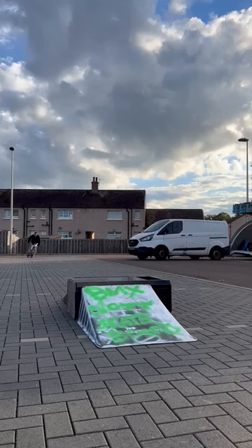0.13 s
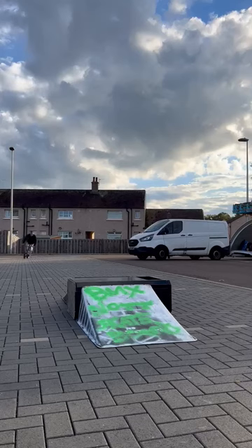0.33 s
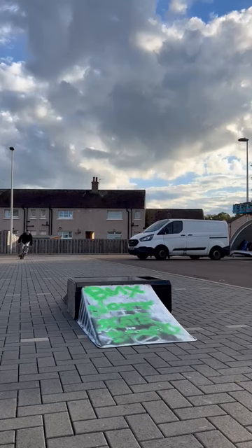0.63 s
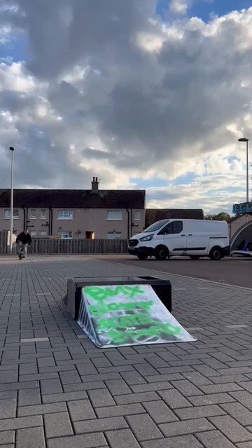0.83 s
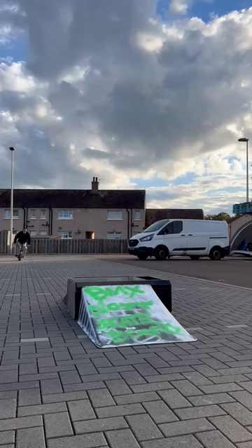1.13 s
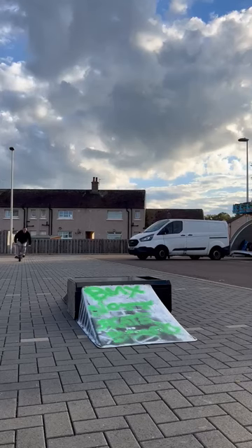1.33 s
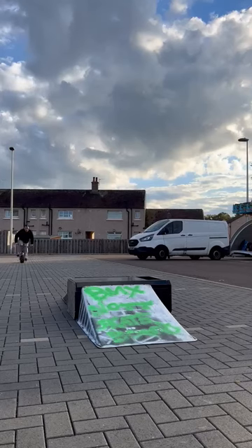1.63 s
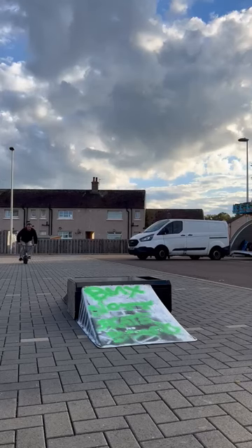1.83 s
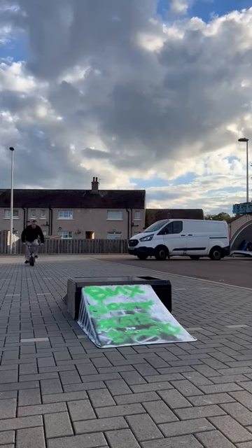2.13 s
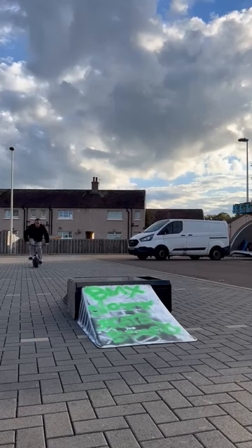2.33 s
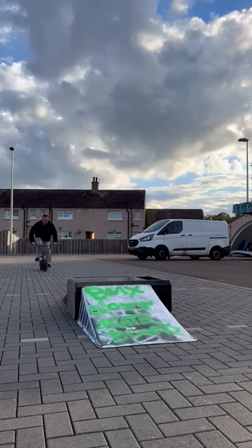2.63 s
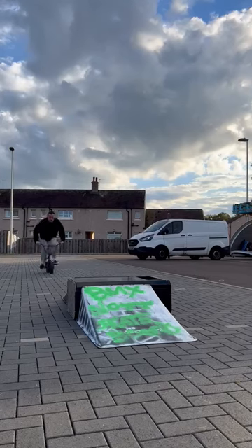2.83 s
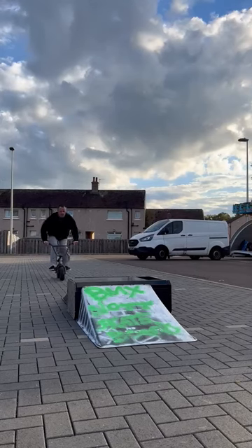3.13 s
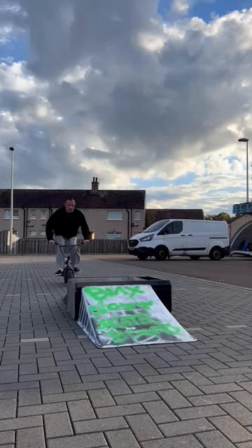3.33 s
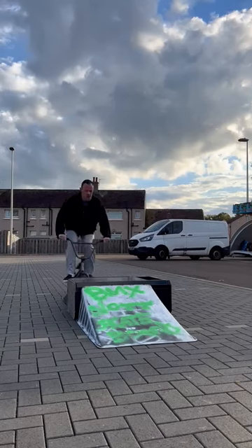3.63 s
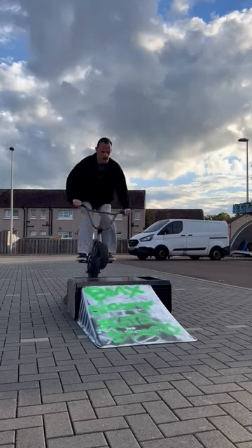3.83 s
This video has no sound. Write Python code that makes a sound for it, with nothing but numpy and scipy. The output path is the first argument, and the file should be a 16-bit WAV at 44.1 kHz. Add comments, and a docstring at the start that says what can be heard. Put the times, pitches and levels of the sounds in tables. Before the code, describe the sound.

Bicycle wheels bang hard onto a hollow ramp at the end, cracking, knocking and booming, after tyres patter ever closer over block paving in an open yard, with light wind buffeting a phone on the ground.

```python
"""Tyres patter over block paving, ever clearer, then wheels slam onto a hollow ramp that cracks, knocks and booms.
The patter is a slap and a gritty burst per joint, over a roar and a narrow hum that grow as the bike nears,
and a treble hiss that drops away before the ramp. Front and rear wheel ring damped modes of the ramp;
the freewheel of the coasting rider buzzes tooth by tooth, louder across the top. House fronts echo faintly,
light wind buffets the microphone of a phone on the ground, and the town murmurs behind."""
import sys
import numpy as np
from scipy import signal
from scipy.fft import rfft, irfft
from scipy.io import wavfile
from scipy.ndimage import uniform_filter1d

SR = 44100
rng = np.random.default_rng(int(sys.argv[2]) if len(sys.argv) > 2 else 0)


def wav_out(sig):
    """Save sig, one row per channel (or a flat mono array), as 16-bit PCM at SR to the path in sys.argv[1]."""
    wavfile.write(sys.argv[1], SR, np.round(np.clip(np.atleast_2d(sig).T, -1, 1) * 32767).astype(np.int16))


N = 176400

# Wheel blows on the ramp: t/s, boom/dB, knock/dB, clack/dB, crack/dB
BLOWS = [(3.6262, -53, -30, -17.5, -20), (3.6292, -21, -23.5, -53, -24.5), (3.6352, -25.5, -14.5, -33, -32),
         (3.6658, -54, -18, -32, -47), (3.6795, -16.5, -35, -46, -43), (3.7194, -57, -24.5, -26.5, -22.5),
         (3.7224, -13.5, -17.5, -38.2, -29.5), (3.7281, -25, -16, -32, -57),
         (3.7325, -37.0, -18.5, -56, -62), (3.7376, -12, -55, -44.0, -66), (3.7622, -49, -33, -44, -58),
         (3.7918, -13.5, -32.5, -35.5, -43), (3.8, -12.0, -48, -59, -73), (3.8302, -20, -35.5, -41, -65),
         (3.9287, -27, -34, -58, -49)]
RAMP_START_S = BLOWS[0][0]  # first wheel touches the ramp
# Modes of the ramp's edge: f/Hz, level/dB, t60/s
EDGE_MODES = [(818, -11, 0.041), (994, -10.5, 0.068), (1206, -7.5, 0.035), (1380, -6, 0.041),
              (1667, -13.5, 0.058), (1996, -6, 0.015), (2317, -4, 0.019)]
EDGE_RISE_S = 0.00017
# Colour of the crack at the contact: f/Hz, level/dB
CRACK_COLOUR = [(500, -4.5), (1500, -0.5), (2600, 8.5), (3400, -2.5), (6100, 1.5), (8000, -4.5),
                (11200, -6.5), (12300, -31)]
CRACK_DECAY_S = 0.0016
# Rumble of the hollow box under the wheels: t/s, level/dB
DECK_LEVEL = [(3.63, -44), (3.69, -34.5), (3.86, -40), (4, -46)]


def undb(db):
    """Decibels to gain."""
    return 10 ** (np.asarray(db) / 20)


def clock():
    """Time of every sample in seconds."""
    return np.arange(N) / SR


def curve(points):
    """Straight lines through (t/s, value) points."""
    return np.interp(clock(), *np.array(points).T)


def colour(x, points):
    """Causal minimum-phase filter through (f/Hz, level/dB) points that keeps the power of white noise."""
    hz, db = np.array(points).T
    size = 2 * N
    log_hz = np.log(np.fft.rfftfreq(size, 1 / SR) + 1)
    gain = undb(np.interp(log_hz, np.log(hz), db))
    gain /= np.sqrt(np.mean(gain ** 2))
    # Folding the cepstrum onto positive time makes the filter causal
    cepstrum = irfft(np.log(gain))
    cepstrum[1:N] *= 2
    cepstrum[N + 1:] = 0
    response = np.exp(rfft(cepstrum))
    return irfft(rfft(x, size) * response)[..., :N]


def noise(points):
    """Coloured stereo noise, most alike in both channels in the bass."""
    side_db, side_cut_hz = -10.5, 61
    mid, side = colour(rng.standard_normal((2, N)), points)
    high_pass = signal.butter(1, side_cut_hz, "high", fs=SR, output="sos")
    side = signal.sosfilt(high_pass, side)
    return mid + undb(side_db) * np.array([side, -side])


def walk(rate):
    """Smooth random curve with unit spread, taking `rate` steps per second."""
    step_length = int(SR / rate)
    steps = np.repeat(rng.standard_normal(N // step_length + 1), step_length)
    smooth = uniform_filter1d(steps, step_length)[:N]
    return smooth / np.std(smooth)


def strikes(times, db):
    """One impulse for each event."""
    out = np.zeros(N)
    samples = np.round(np.asarray(times) * SR).astype(int)
    np.add.at(out, np.clip(samples, 0, N - 1), undb(db))
    return out


def repeats(rate, anchor_s):
    """Times of an event that recurs at a changing (t/s, events per second) rate, once at the anchor."""
    turns = np.cumsum(curve(rate)) / SR
    turns -= np.interp(anchor_s, clock(), turns)
    return clock()[1:][np.diff(np.floor(turns)) > 0]


def bursts(pulses, decay_s):
    """An exponentially dying burst of noise on each impulse."""
    envelope = signal.lfilter([1], [1, -np.exp(-1 / (decay_s * SR))], pulses)
    return envelope * rng.standard_normal(N)


def ring(pulses, modes, rise_s):
    """Impulses ring damped (f/Hz, level/dB, t60/s) modes that build up over the contact time."""
    t = clock()[:SR]
    tone = np.zeros(SR)
    for hz, db, t60 in modes:
        tone += undb(db) * np.sin(2 * np.pi * hz * t) * np.exp(-np.log(1000) * t / t60)
    return signal.fftconvolve(pulses, tone * (1 - np.exp(-t / rise_s)))[:N]


def ramp():
    """Each blow cracks at the contact, rings box, deck and edge, and shakes the panels into a rattle."""
    # Modes of air and frame, then of the deck: f/Hz, level/dB, t60/s
    boom_modes = [(82, 1.8, 0.099), (112.2, -10, 0.23), (168, -9, 0.15)]
    knock_modes = [(287.7, -11.5, 0.234), (334.6, -9, 0.083), (429, -2.5, 0.043), (490, -5, 0.061),
                   (526, -2.5, 0.013), (640, -12.5, 0.033), (728, -18.5, 0.052)]
    # Colour of the rattling panels: f/Hz, level/dB
    rattle_colour = [(200, -12.5), (500, 10.5), (900, -1), (2500, -17), (5000, -36.5)]
    boom_rise_s, knock_rise_s = 0.0045, 0.00087
    splinter_db, splinter_decay_s = -12.5, 0.0048  # longer, weaker tail of the crack
    rattle_db, rattle_decay_s = -13 - 20 * np.log10(2), 0.017

    times, *levels = np.array(BLOWS).T
    boom, knock, clack, crack = (strikes(times, db) for db in levels)
    body = ring(boom, boom_modes, boom_rise_s)
    body += ring(knock, knock_modes, knock_rise_s)
    body += ring(clack, EDGE_MODES, EDGE_RISE_S)
    splinter = undb(splinter_db) * bursts(crack, splinter_decay_s)
    snap = colour(bursts(crack, CRACK_DECAY_S) + splinter, CRACK_COLOUR)
    rattle = undb(rattle_db) * colour(bursts(knock, rattle_decay_s), rattle_colour)
    return body + snap + rattle + chatter()


def chatter():
    """Loose panels tap at random while the wheels load the deck: edge modes plus half-strength cracks."""
    taps_per_s, below_deck_db = 90, -11
    taps = (rng.random(N) < taps_per_s / SR) * rng.standard_normal(N)
    taps *= (clock() > RAMP_START_S) * undb(curve(DECK_LEVEL) + below_deck_db)
    snap = colour(bursts(taps, CRACK_DECAY_S), CRACK_COLOUR)
    return ring(taps, EDGE_MODES, EDGE_RISE_S) + snap / 2


def deck_rumble():
    """The hollow box rumbles as low coloured noise once the first wheel is on it."""
    # Colour of the box: f/Hz, level/dB
    box_colour = [(40, -24.5), (85, -6.5), (120, 3), (200, -9.5), (520, -18), (3000, -58)]
    loaded = clock() > RAMP_START_S
    return loaded * undb(curve(DECK_LEVEL)) * noise(box_colour)


def freewheel():
    """The pawl drops over the teeth of the slowing freewheel, one short noise tick per tooth."""
    # Teeth passed: t/s, rate/(1/s)
    tooth_rate = [(3.5, 91), (3.86, 81), (3.93, 75.5), (4, 61.5)]
    # Strength of the ticks, which start at the first time: t/s, level/dB
    tick_level = [(3.05, -62), (3.8, -59.5), (3.84, -56), (3.88, -45), (3.91, -46), (4, -48.5)]
    # Colour of a tick: f/Hz, level/dB
    tick_colour = [(3000, -17), (7300, -9), (8600, 4), (10700, -5), (12000, -38)]
    one_tooth_s, scatter_db, tick_decay_s = 3.9517, 2.5, 0.0037

    teeth = repeats(tooth_rate, one_tooth_s)
    teeth = teeth[teeth > tick_level[0][0]]
    scatter = scatter_db * rng.standard_normal(len(teeth))
    ticks = strikes(teeth, np.interp(teeth, *np.array(tick_level).T) + scatter)
    return colour(bursts(ticks, tick_decay_s), tick_colour)


def distant_clack():
    """The bike, still far away, clacks once: a short burst of coloured noise."""
    # The clack: t/s, level/dB, decay/s
    at, db, decay_s = (1.2374, -41.5, 0.0076)
    # Its colour: f/Hz, level/dB
    clack_colour = [(300, -8), (800, 7.5), (1600, 2), (2400, 8), (3400, -16), (12000, -25)]
    return colour(bursts(strikes([at], [db]), decay_s), clack_colour)


def tyres():
    """Both tyres slap every paving joint up to the ramp, over a roar and a fine, flickering hiss."""
    # Paving joints crossed: t/s, rate/(1/s)
    joint_rate = [(0, 40), (1.6, 51), (2.02, 52.5), (2.95, 58.5), (3.3, 56.5), (3.6, 52.5)]
    # Loudness of patter and roar: t/s, level/dB
    tyre_level = [(0, -76.5), (1.4, -63.5), (2, -60.5), (2.7, -57.5), (3.3, -56), (3.61, -51.5),
                  (3.78, -60)]
    # Loudness of the treble hiss: t/s, level/dB
    hiss_level = [(0, -74), (1.2, -68), (2.2, -63.5), (2.45, -60.5), (3, -59.5), (3.05, -70.5), (3.6, -71),
                  (3.7, -80)]
    # Colours of patter, roar and hiss: f/Hz, level/dB
    patter_colour = [(200, 4.5), (450, 3.5), (1050, -0.5), (1700, 2.5), (2700, 0), (3500, -18),
                     (12000, -46)]
    roar_colour = [(40, -15), (135, -2.5), (250, -1), (650, 1), (1100, -3.5), (2600, -8), (3600, -20),
                   (12000, -43)]
    hiss_colour = [(1500, -5.5), (2700, 5), (3500, -3.5), (6700, 1), (11000, -4), (12200, -36)]
    anchor_joint_s = 3.5855  # one joint shortly before the ramp
    jitter_s, scatter_db = 0.0003, 1.5
    rear_db, rear_lag_s = -9, 0.0075
    slap_db, grit_decay_s = 18, 0.0015  # clean slap over its gritty tail
    clearer_db_per_s = 1.5  # the joints stand out more as the bike nears
    roar_db = -2
    flicker_db, flicker_per_s = 3, 34

    joints = repeats(joint_rate, anchor_joint_s)
    chance = rng.standard_normal((4, len(joints)))
    front = strikes(joints + jitter_s * chance[0], scatter_db * chance[1])
    rear = strikes(joints + rear_lag_s + jitter_s * chance[2], rear_db + scatter_db * chance[3])
    slaps = front + rear
    patter = colour(undb(slap_db) * slaps + bursts(slaps, grit_decay_s), patter_colour)
    patter /= np.std(patter)
    on_paving = clock() < RAMP_START_S
    patter *= on_paving * undb(clearer_db_per_s * (clock() - anchor_joint_s))
    rolling = patter + undb(roar_db) * noise(roar_colour)
    flicker = flicker_db * walk(flicker_per_s)
    hiss = undb(curve(hiss_level) + flicker) * noise(hiss_colour)
    return undb(curve(tyre_level)) * rolling + hiss


def drone():
    """The tyre casings hum in a narrow band of noise that comes up as the bike nears."""
    # Loudness of the hum: t/s, level/dB
    hum_level = [(2.3, -80), (3, -57.5)]
    centre_hz, width_hz = 138, 23
    edges_hz = centre_hz + np.array([-.5, .5]) * width_hz
    band_pass = signal.butter(2, edges_hz, "band", fs=SR, output="sos")
    band = signal.sosfilt(band_pass, rng.standard_normal(N))
    return undb(curve(hum_level)) * band / np.std(band)


def house_fronts(x):
    """A faint, dull, diffuse echo: decaying noise that swells in first, different in each channel."""
    echo_db, t60_s, swell_s, top_hz = -17.5, 1, 0.0086, 5000
    t = clock()[:SR]
    envelope = np.exp(-np.log(1000) * t / t60_s) * (1 - np.exp(-t / swell_s))
    tail = rng.standard_normal((2, SR)) * envelope
    tail /= np.sqrt(np.sum(tail ** 2) / 2)  # unit mean energy per channel, before the treble goes
    tail = signal.sosfilt(signal.butter(2, top_hz, fs=SR, output="sos"), tail)
    return undb(echo_db) * signal.fftconvolve(x[None], tail, axes=1)[:, :N]


def wind():
    """Single eddies push on the microphone and ring its bass cut, over an uneven rumble."""
    # Eddies, relative strength (doubled below): t/s, level/dB
    eddies = [(.559, -23), (0.585, -27.5), (.594, -24), (0.669, -22), (0.708, -26), (0.759, -33.5),
              (0.836, -26.5), (0.91, -32), (1.115, -30.5)]
    # Rumble of the breeze: t/s, level/dB
    breeze_level = [(0, -57), (.4, -48), (.58, -43.5), (1.02, -47.5), (1.22, -65), (1.73, -66), (1.77, -39),
                    (1.83, -43), (1.9, -61), (2.58, -73), (2.62, -50.5), (2.7, -57)]
    # Its colour: f/Hz, level/dB
    breeze_colour = [(20, -16), (45, 2.5), (85, 0), (210, -14), (800, -59)]
    eddy_s = 0.002  # standard deviation of one bell-shaped push
    cut_order, cut_hz = 6, 56.4

    pushes = np.zeros(N)
    for at, db in eddies:
        pushes += undb(db) * np.exp(-.5 * ((clock() - at) / eddy_s) ** 2)
    bass_cut = signal.butter(cut_order, cut_hz, "high", fs=SR, output="sos")
    buffets = 2 * signal.sosfilt(bass_cut, pushes)
    return buffets + undb(curve(breeze_level)) * noise(breeze_colour)


def town():
    """The town murmurs as steady noise, weighted to the bass."""
    # Colour of the murmur: f/Hz, level/dB
    town_colour = [(25, -5), (90, 0), (1000, -15), (3500, -42), (12000, -67)]
    town_db = -60.5
    return undb(town_db) * noise(town_colour)


def scene():
    """Bike and ramp in an open, breezy yard; only blows, freewheel and clack feed the echo."""
    hits = ramp() + freewheel() + distant_clack()
    bike = hits + deck_rumble() + tyres() + drone()
    return bike + house_fronts(hits) + wind() + town()


def record(dry):
    """The phone widens the sound to stereo by a phase lead that varies with frequency; deep bass and top are cut."""
    # Phase by which the left channel leads, from zero at 0 Hz: f/Hz, phase/rad
    stereo_phase = [(500, 0.36), (1850, 0), (2700, 3.5), (3250, 3.5), (3700, .5), (4800, 1.16), (5500, 2),
                    (6500, 4), (7500, 8), (8500, 6), (9600, 10), (10600, 9), (11600, 13.5)]
    bass_cut_hz, top_hz = 35, 12979
    hz = np.fft.rfftfreq(2 * N, 1 / SR)
    lead = np.interp(hz, *np.vstack([np.zeros(2), stereo_phase]).T)
    turn = np.exp(.5j * np.array([lead, -lead]))  # left turns ahead by half the lead, right back by half
    stereo = irfft(rfft(dry, 2 * N) * turn)[:, :N]
    bass_cut = signal.butter(2, bass_cut_hz, "high", fs=SR, output="sos")
    top_cut = signal.ellip(8, .2, 70, top_hz, fs=SR, output="sos")  # .2 dB ripple, 70 dB down
    return signal.sosfilt(top_cut, signal.sosfilt(bass_cut, stereo))


dry = scene()
out = record(dry)
wav_out(out)
```